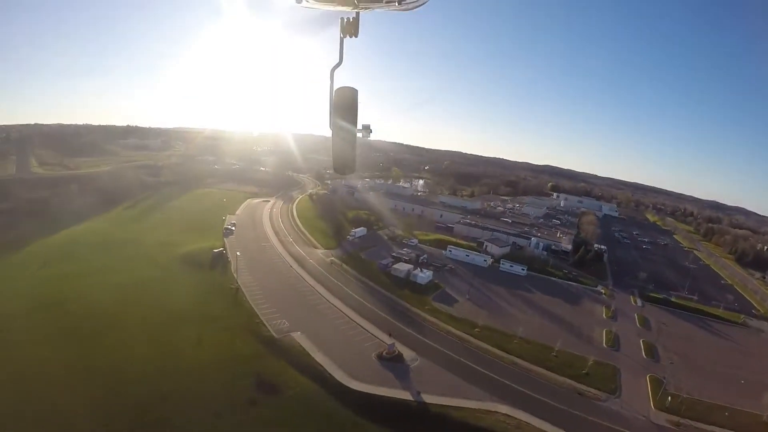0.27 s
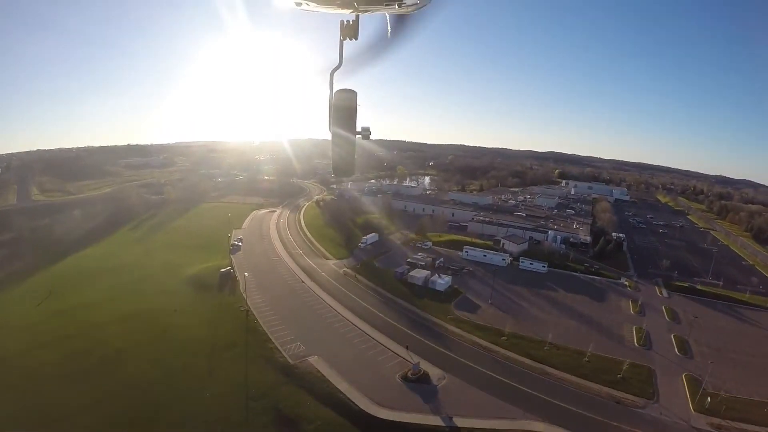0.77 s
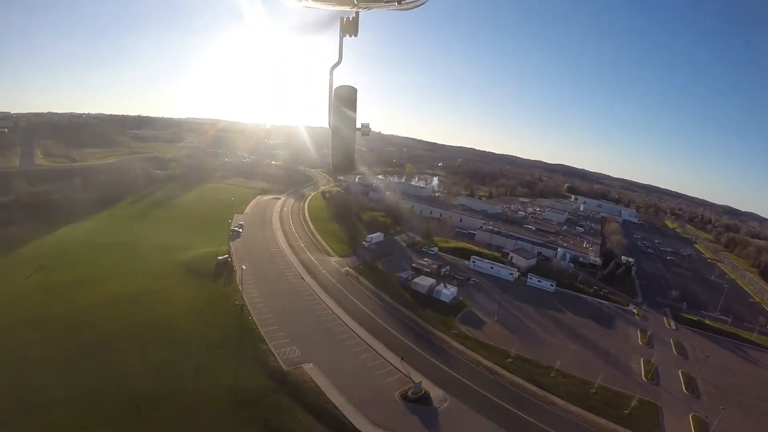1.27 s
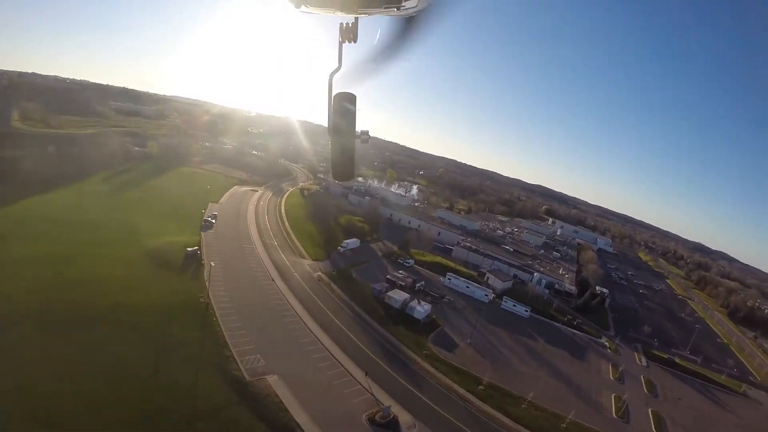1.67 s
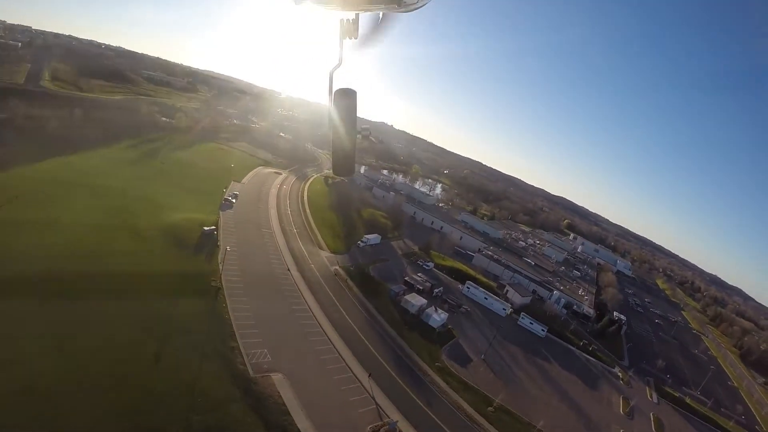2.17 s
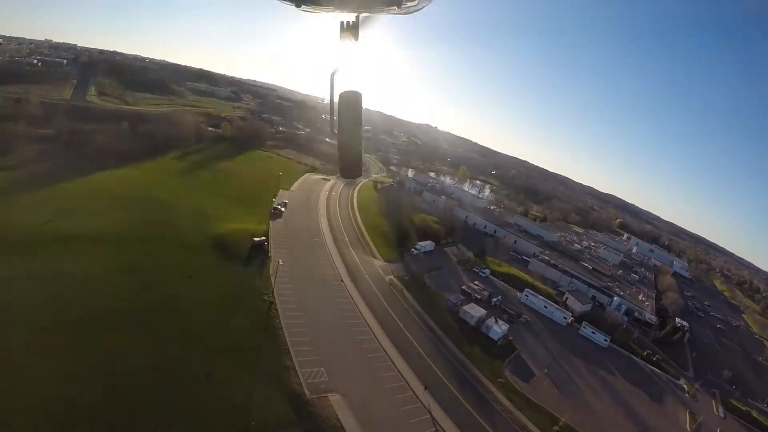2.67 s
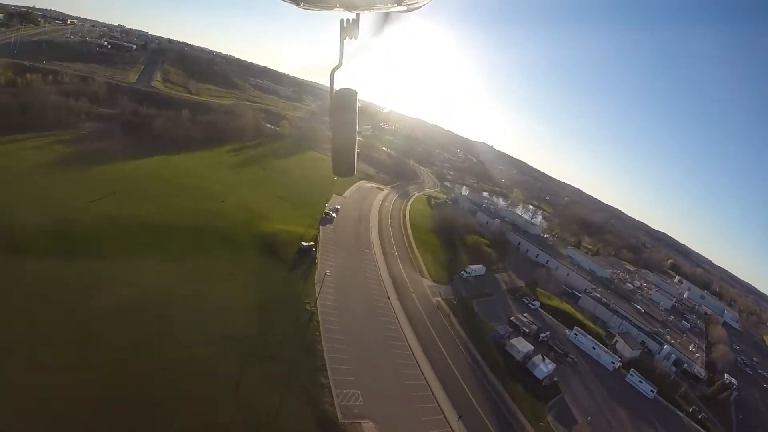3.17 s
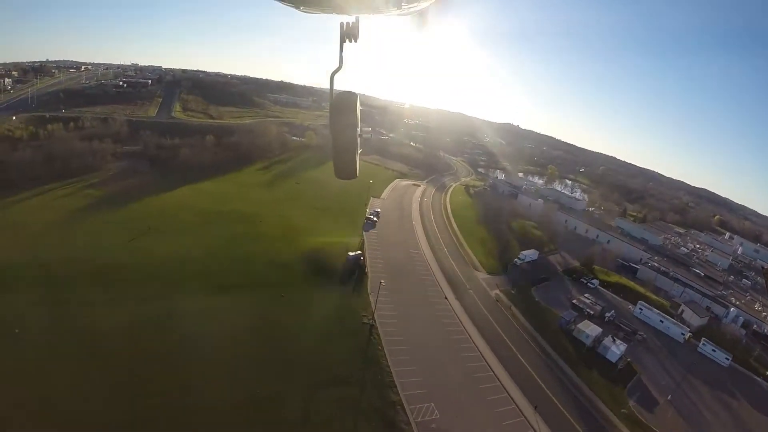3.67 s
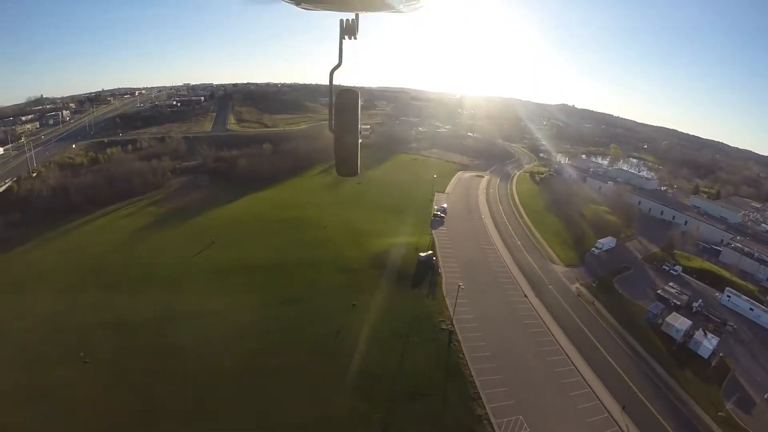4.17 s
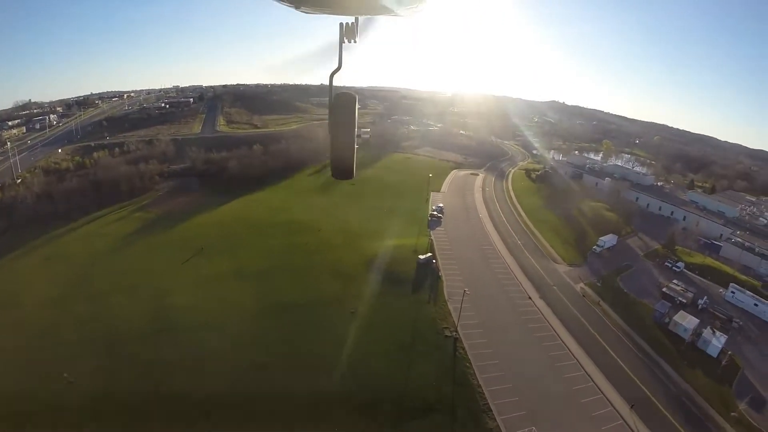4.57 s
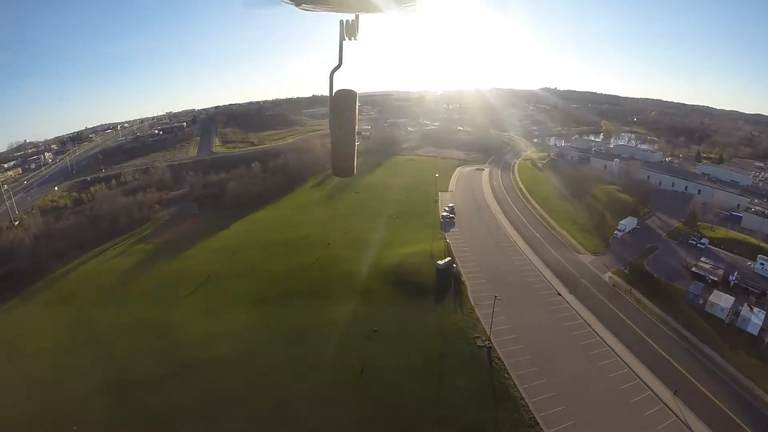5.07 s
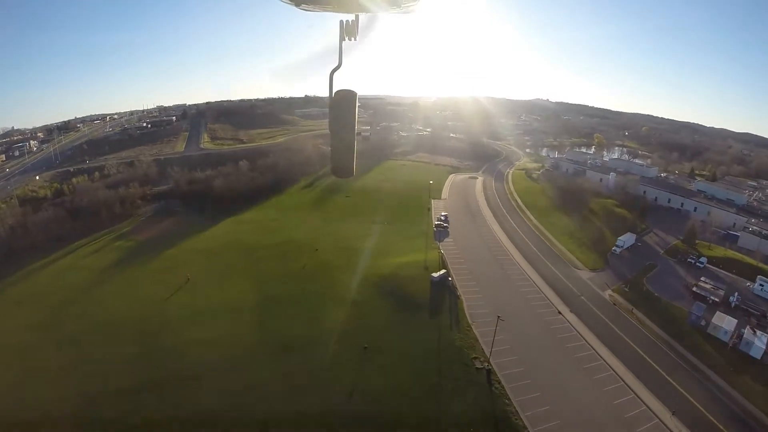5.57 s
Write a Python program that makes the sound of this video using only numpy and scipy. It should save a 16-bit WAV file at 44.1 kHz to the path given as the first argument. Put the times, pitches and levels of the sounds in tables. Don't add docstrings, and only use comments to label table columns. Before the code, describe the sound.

Airborne with a microphone under the nose of an electric model plane: first the throttle is cut and the motor's singing tone slides down within a second. It pulses, descends in small steps over the next few seconds, and levels out. Two blades chop a fast hiss, the frame buzzes, a faint high whistle stays fixed, and gusts thump and rumble right against the microphone.

```python
import sys
import numpy as np
from scipy import signal
from scipy.fft import rfft, irfft, next_fast_len
from scipy.io import wavfile
from scipy.ndimage import uniform_filter1d, map_coordinates

SR = 44100
rng = np.random.default_rng(int(sys.argv[2]) if len(sys.argv) > 2 else 0)


def wav_record(signal):
    frames = np.transpose(np.atleast_2d(signal))
    bounded = np.clip(frames, -1, 1)
    quanta = np.round(bounded * 32767).astype(np.int16)
    wavfile.write(sys.argv[1], SR, quanta)


def linear_from_db(decibels):
    return 10 ** (np.asarray(decibels, float) / 20)


N = 256662
STEP = 64
CRUISE_LOAD_DB, CRUISE_WIND_DB = -46, -15


def unit(x):
    return x / np.sqrt(np.mean(x ** 2) + 1e-20)


def along(points, hz):
    f, v = np.transpose(points)
    return np.interp(np.log(hz + 1), np.log(f + 1), v)


def control_times():
    return np.arange(0, N + STEP, STEP) / SR


def curve(rows):
    s, value = np.transpose(rows)
    return np.interp(control_times(), s, value)


def full(control):
    return np.interp(np.arange(N) / STEP, np.arange(len(control)), control)


def wobble(rate):
    knots = rng.standard_normal(int(N * rate / SR) + 4)
    return map_coordinates(knots, [control_times() * rate])


def bumps(rows):
    t = control_times()
    return sum(db * np.exp(-((t - s) / half) ** 2) for s, db, half in rows)


def resonance(hz, centre, width):
    return 1 / (1 + (2 * (hz - centre) / width) ** 2)


def tone(phase, db):
    return np.sqrt(2) * full(linear_from_db(db)) * np.sin(phase + rng.uniform(0, 2 * np.pi))


def noise(spectrum, patchy_db):
    z = signal.stft(rng.standard_normal(N + 512), nperseg=512)[2]
    field = uniform_filter1d(rng.standard_normal(z.shape), 5, 0)
    field = unit(uniform_filter1d(field, 10, 1))
    x = signal.istft(z * linear_from_db(patchy_db * field), nperseg=512)[1]
    m = next_fast_len(N + 8192)
    colour = linear_from_db(along(spectrum, np.fft.rfftfreq(m, 1 / SR)))
    return unit(irfft(rfft(x, m) * colour, m)[:N])


# (time [s], turns [Hz])
GOVERNED_SPEED = [(0.6, 75.1), (.75, 74.6), (.9, 73.6), (1.2, 70), (1.48, 69.67), (1.6, 69), (2.1, 66.4),
                  (2.35, 64.7), (2.65, 63.27), (2.87, 63.23), (3.07, 61.42), (3.5, 57.53), (3.95, 56.9),
                  (4.5, 56.68), (4.62, 57.37), (4.95, 57.6), (5.5, 57.1), (5.82, 57.4)]


def shaft():
    from_hz, to_hz, rundown_s = 110, 70, .295
    free = to_hz + (from_hz - to_hz) * np.exp(-control_times() / rundown_s)
    governed = curve(GOVERNED_SPEED) + 0.1202 * wobble(6)
    still_free = np.logical_and.accumulate(free > governed)
    hz = np.where(still_free, free, governed)
    tremble = 0.0017 * full(wobble(25))
    return hz, 2 * np.pi * np.cumsum(full(hz)) / SR + tremble


# (time [s], blade hiss
# level [dB])
LOAD = [(0, -54), (.25, -48.5), (.47, -51), (.53, -53.5), (.9, -52.5), (1.12, -51.5), (1.6, -49),
        (2.1, -48.5), (2.45, -46.5), (2.8, -48.5), (2.97, -52), (3.3, -50), (3.7, -47), (4.33, -45.5),
        (4.7, -45.5), (4.85, -45), (5.0, -46), (5.82, -46.5)]


def blade_load():
    return curve(LOAD)


# (centre [Hz], width [Hz], depth [dB])
MOUNT_NODES = [(984.5, 12, -18), (1210, 29, -11), (1324, 17, -20), (1814, 36, -10), (1772, 30, -8.5),
               (2200, 130, -8)]


def carried(modes, hz, steep, follows):
    power = sum(linear_from_db(2 * db) * resonance(hz, c, w) ** steep for c, w, db in modes)
    nodes_db = sum(db * resonance(hz, c, w) for c, w, db in MOUNT_NODES)
    return 10 * np.log10(power) + nodes_db + follows * (blade_load() - CRUISE_LOAD_DB)


# (centre [Hz], width [Hz], level at cruise load [dB])
MAGNET_MODES = [(1500, 73, -31.5), (1367, 50, -23), (1253, 36, -23.5), (1102, 66, -18.5), (1011, 40, -24.5),
                (944.5, 32, -26), (885.4, 27.5, -15.5), (867, 58, -19.5), (795.6, 45, -23)]
SLOT_MODES = [(810, 13, -30), (771, 50, -24), (742, 18.2, -16)]
DOUBLE_MODES = [(2085, 50, -46), (1920, 60, -51), (1840, 45, -35.5), (1722, 56, -39.5), (1583.5, 24, -33.5),
                (1610, 33, -37.5)]
FOURTH_MODES = [(3750, 90, -60.5), (3532, 62, -44), (3244, 26, -56.5)]
# (time [s], level [dB], half length [s])
TORQUE_KICKS = [
    (0.716, 1, 0.052),
    (.89, 6, 0.024),
    (0.957, 8, 0.021),
    (1.358, 8.5, 0.024),
    (1.46, -10, 0.065),
    (1.627, 2.5, .08),
    (1.862, 2, 0.042),
    (3.4, -1.5, .12),
    (4.813, 4, 0.059),
]
# (multiple of shaft speed, level [dB])
WEAK_ORDERS = [(1, -39), (11, -62.5), (13, -61), (21, -68.5), (23, -72), (24, -61), (26, -61), (27, -75),
               (30, -50.5), (32, -63), (33, -50.5), (34, -59.5), (35, -68.5), (37, -49), (42, -45),
               (44, -55.5), (46, -52), (47, -47), (50, -51), (51, -47.5), (53, -45.5), (54, -51), (58, -45),
               (70, -44), (84, -41)]
# (frequency [Hz], gain [dB])
AIRFRAME = [(620, 14), (690, 14.5), (750, 27.5), (810, 30), (1100, 21), (1366, 23), (1430, 15.5),
            (1720, 7.5), (1830, -7), (2150, -7), (2650, -7.5), (3050, -5.5), (3500, -20), (4200, -21)]


def motor(hz, angle):
    magnets_db = carried(MAGNET_MODES, 14 * hz, steep=1.25, follows=0.85)
    magnets_db = magnets_db + bumps(TORQUE_KICKS) + 1.3 * wobble(6)
    slots_db = carried(SLOT_MODES, 12 * hz, steep=2.02, follows=0.54) + 1.3 * wobble(5.96)
    double_db = carried(DOUBLE_MODES, 28 * hz, steep=1.2, follows=0.34) + 1.7 * wobble(6.4)
    fourth_db = carried(FOURTH_MODES, 56 * hz, steep=1.4, follows=.6) + 1.2 * wobble(6)
    strong = [(14, magnets_db), (12, slots_db), (28, double_db), (56, fourth_db)]
    whine = sum(tone(multiple * angle, db + 0.43 * wobble(18)) for multiple, db in strong)
    whine += tone(52 * angle, fourth_db - 3 + wobble(10))
    whine += tone(16 * angle, magnets_db - 25)
    whine += tone(18 * angle, fourth_db + 3)
    load_db = 1.53 * (blade_load() - CRUISE_LOAD_DB)
    for multiple, db in WEAK_ORDERS:
        heard_db = db + along(AIRFRAME, multiple * hz) + load_db
        whine += tone(multiple * angle, heard_db + 0.45 * wobble(11))
    return whine


# (distance [shaft orders], level re blade hiss [dB])
ROTOR_BEATS = [(-86, -18), (-84, -17), (-21, -24), (-14, -22), (-6, -29), (-4, -26), (-2, -25), (-1, -29),
               (1, -30), (2, -26), (4, -20), (6, -21), (8, -30), (10, -29), (14, -33), (-70, -19)]
# (centre [Hz], width [Hz], lift [dB])
CAN_MODES = [
    (3535, 110, 25),
    (6600, 120, 12),
]


def controller(hz, angle):
    switch_hz = 7813
    carrier = 2 * np.pi * switch_hz * np.arange(N) / SR
    hiss_db = blade_load()
    whistle = tone(carrier, hiss_db - 8.5 + 0.69 * wobble(6.1))
    for away, db in ROTOR_BEATS:
        beat_hz = switch_hz + away * hz
        lift_db = sum(top * resonance(beat_hz, c, w) for c, w, top in CAN_MODES)
        load_db = hiss_db + 0.27 * (hiss_db + 33.5)
        whistle += tone(carrier + away * angle, db + lift_db + load_db + 1.5 * wobble(9.0))
    return whistle


# (time [s],
# strength [dB])
WIND = [(0, -12.5), (.25, -10.5), (.47, -13), (.53, -17.5), (.75, -10.5), (1.15, -15.5), (1.65, -11),
        (1.9, -12.5), (2.12, -13), (2.35, -15.5), (2.8, -13), (2.97, -19.5), (3.5, -17.5), (4.16, -14),
        (4.35, -15.5), (4.9, -13.5), (5.3, -14), (5.82, -15)]
# (time [s], level [dB], half length [s])
GUSTS = [
    (.78, -2.5, 0.09),
    (1.65, 2.5, 0.037),
    (2.13, 3, 0.038),
    (2.5, -3, 0.11),
    (4.21, 4.5, .03),
    (4.72, -2.5, .06),
    (5.1, 2.5, .04),
    (5.6, 3, .07),
]


def air_levels():
    wind_db, load_db = curve(WIND) - CRUISE_WIND_DB, blade_load() - CRUISE_LOAD_DB
    buffet_db = -15.0 + 0.7 * wind_db + bumps(GUSTS) + .5 * wobble(7)
    rush_db = -28.5 + 0.79 * wind_db + 0.27 * load_db + 0.97 * wobble(8)
    buzz_db = -45.5 + .15 * wind_db + 0.63 * load_db + 0.25 * wobble(6)
    hiss_db = -46.0 + load_db + 0.4 * wobble(7)
    return buffet_db, rush_db, buzz_db, hiss_db


# (centre [Hz], width [Hz], level re frame buzz [dB])
RINGS = [(2500, 9.2, -10), (2690, 37, -16), (2933, 55, -8), (3353, 9.8, -13)]


def frame_rings():
    f = np.fft.rfftfreq(N, 1 / SR)
    push = rfft(rng.standard_normal(N))
    rings = 0
    for c, w, db in RINGS:
        mode = f * w / (c * c - f * f + 1j * f * w)
        rings = rings + linear_from_db(db) * unit(irfft(push * mode ** 2, N))
    return rings


# (frequency [Hz], level per Hz [dB])
BUFFET = [(7.1, -34), (12, -1), (43, 0), (113, 0.5), (254, -9.5), (400, -21), (520, -27.5), (880, -120)]
RUSH = [(120, -38.5), (250, -3.5), (400, -3), (620, -7), (850, -7), (1100, -10.5), (1350, -18.5),
        (1700, -27), (2200, -48.5), (5000, -120)]
BUZZ = [(300, -120), (900, -20.5), (1400, -4.5), (1900, 1), (2300, -4.5), (2600, -5.5), (2950, -1.5),
        (3300, -7.5), (3700, -13), (4500, -37), (8000, -120)]
HISS = [(1500, -120), (2600, -29.5), (3600, -1), (4840, 3), (5490, -0.5), (6040, 4.5), (6850, 0),
        (7500, -4), (8200, -7), (9300, -17.5), (13000, -120)]
TOP_AIR = [(4000, -120), (7500, -2.5), (9300, 0), (11000, -4.5), (12000, -9), (13200, -9.5), (15200, -14.5)]


def slipstream(angle):
    buffet_db, rush_db, buzz_db, hiss_db = [full(c) for c in air_levels()]
    gust = full(wobble(18))
    chop = np.cos(2 * angle)
    buffet = linear_from_db(buffet_db) * unit(linear_from_db(1.07 * full(wobble(14))) * noise(BUFFET, patchy_db=0.14))
    rush = linear_from_db(rush_db + 1.5) * unit(linear_from_db(0.97 * full(wobble(30))) * noise(RUSH, patchy_db=0.24))
    buzz = linear_from_db(buzz_db + 6.5) * unit(linear_from_db(0.49 * gust + 0.55 * chop) * noise(BUZZ, patchy_db=0.5))
    rings = linear_from_db(buzz_db) * frame_rings()
    blades = 2.2 * chop + 0.73 * np.cos(angle)
    hiss = linear_from_db(hiss_db + 1.5) * unit(linear_from_db(0.27 * gust + blades) * noise(HISS, patchy_db=1.2))
    airy = linear_from_db(0.39 * hiss_db - 44 + .8 * gust) * noise(TOP_AIR, patchy_db=3.0)
    return airy + buffet + rush + buzz + rings + hiss


def scene():
    hz, angle = shaft()
    return (motor(hz, angle) + controller(hz, angle) + slipstream(angle))[None]


# (frequency [Hz], share [0-1])
STARVED = [(9000, 0), (10000, .06), (11500, .2), (12500, .45), (14000, .6), (15000, .85)]


def starved(x):
    hz, t, z = signal.stft(x, SR, nperseg=1024)
    cells = rng.standard_normal((len(hz) // 5 + 1, len(t) // 2 + 1))
    frames = cells.shape[1]
    spare = np.interp(2 * np.arange(frames), [270, 310], [.5, -.1])
    luck = spare + .85 * cells + .5 * rng.standard_normal(frames)
    luck = np.kron(luck, np.ones((5, 2)))[:len(hz), :len(t)]
    rank = 1 / (1 + np.exp(-1.7 * luck))
    kept = rank > along(STARVED, hz)[:, None]
    return signal.istft(z * kept, SR, nperseg=1024)[1][:, :N]


def roll_off(x):
    return signal.sosfilt(signal.butter(12, 15140, fs=SR, output="sos"), x)


# (time [s], level [dB])
DUCK = [
    (2.7, 0),
    (2.83, 1),
    (2.845, -2.5),
    (2.97, 0),
]


def record(dry):
    ducked = dry * linear_from_db(full(curve(DUCK)))
    soft = ducked / (1 + np.abs(ducked) ** 4) ** (1 / 4)
    mix = starved(soft)
    return roll_off(mix)


dry = scene()
out = record(dry)
wav_record(out)
```